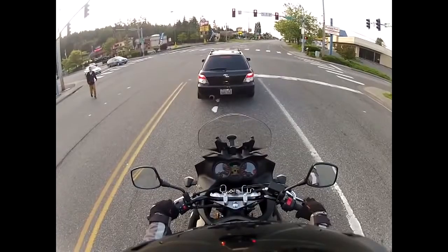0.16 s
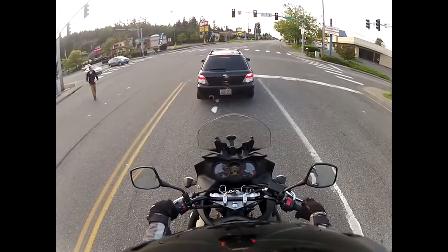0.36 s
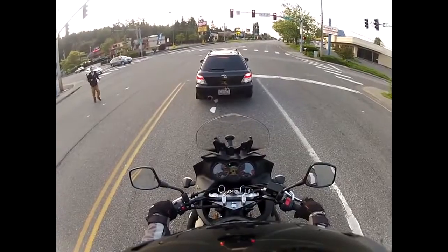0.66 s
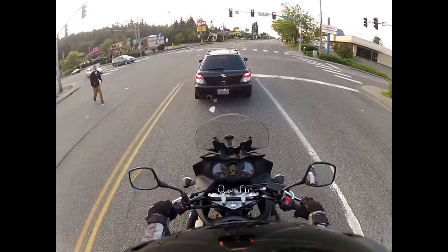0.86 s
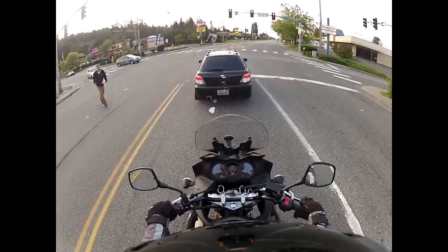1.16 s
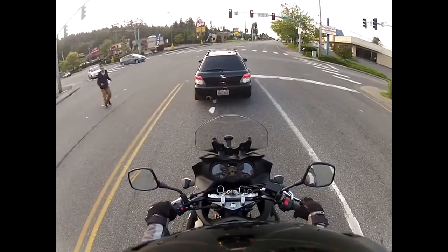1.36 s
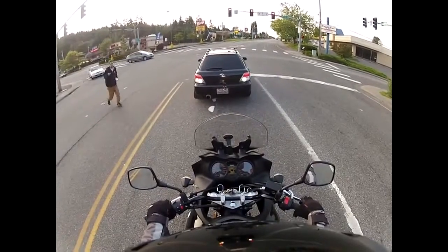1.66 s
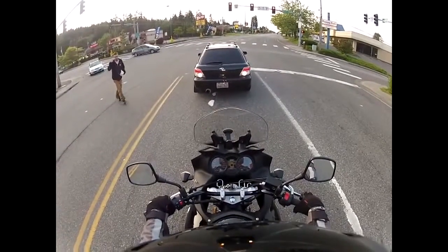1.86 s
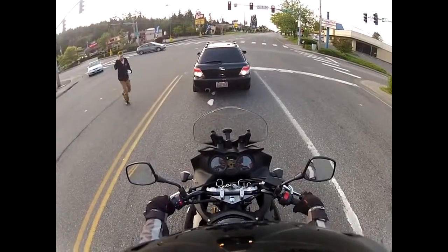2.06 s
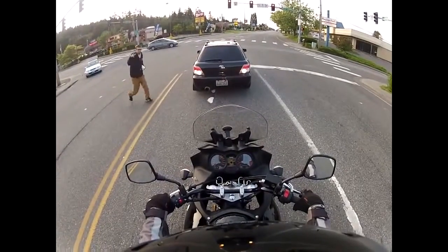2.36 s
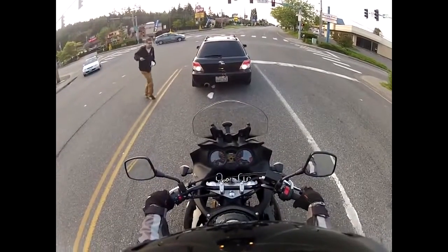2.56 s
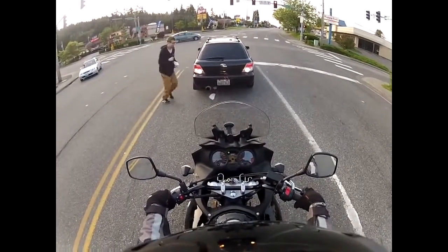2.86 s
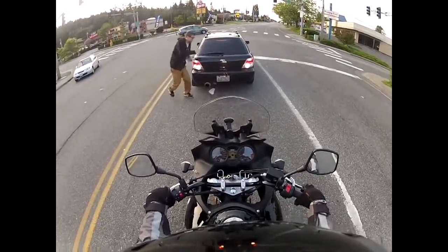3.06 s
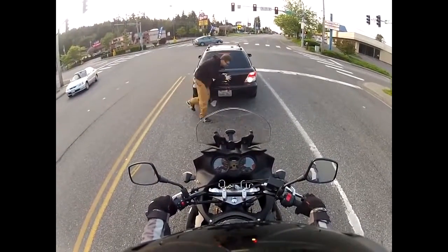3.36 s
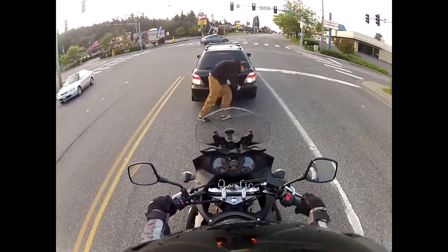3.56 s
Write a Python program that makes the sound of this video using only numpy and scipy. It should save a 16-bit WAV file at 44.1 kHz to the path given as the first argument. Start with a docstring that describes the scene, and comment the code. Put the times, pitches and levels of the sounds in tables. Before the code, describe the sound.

A twin-cylinder motorcycle lopes at idle over muffled traffic rumble, revs once sharply, and drops back.

```python
"""Uneven exhaust beats of an idling twin-cylinder motorcycle at a junction, heard inside a closed case on the
rider, over traffic rumble, road noise ringing in the case and a faint electronic whine. One blip of the
throttle brings an even intake throb, then the engine settles back, with short scuffs against the case.
Beats are clicks through pipe resonances, the throb is summed crank orders, and the road is shaped noise.
The recorder holds each sample at a low rate, which mirrors the sound into the treble."""
import sys
import numpy as np
from scipy import signal
from scipy.fft import rfft, irfft
from scipy.io import wavfile
from scipy.ndimage import uniform_filter1d

SR = 44100
rng = np.random.default_rng(int(sys.argv[2]) if len(sys.argv) > 2 else 0)


def log_audio(samples):
    """Write samples as a 16-bit WAV file to the path given in sys.argv[1]."""
    # one column per channel
    frames = np.atleast_2d(samples).T
    # limit to full scale, then quantise
    limited = np.clip(frames, -1, 1)
    pcm = np.round(limited * 32767).astype(np.int16)
    wavfile.write(sys.argv[1], SR, pcm)


N = 163170
T = np.arange(N) / SR  # seconds


def gain_of(db):
    """Amplitude factor of a level in dB."""
    return 10 ** (np.asarray(db) / 20)


def evened(x):
    """Scales a signal to an overall rms of 1."""
    return x / np.sqrt(np.mean(x ** 2) + 1e-20)


def curve(points, column=1):
    """Draws straight lines over time through one column of a table whose first column is seconds."""
    columns = np.transpose(points)
    return np.interp(T, columns[0], columns[column])


def resonate(x, hz, width):
    """One fixed two-pole resonance with a gain of about 1 at its peak."""
    radius = np.exp(-np.pi * width / SR)
    poles = [1, -2 * radius * np.cos(2 * np.pi * hz / SR), radius * radius]
    return signal.lfilter([1 - radius, 0, radius - 1], poles, x)


def body(x, peaks):
    """Parallel resonances of a hollow body, each at its own level."""
    return sum(gain_of(db) * resonate(x, hz, width) for hz, width, db in peaks)


def noise(spectrum, patchy_db, flicker_db):
    """Noise from random short-time spectra with drifting patches and a flicker shared by all bands; rms 1."""
    frames = N // 128 + 5
    real, imaginary, patches = rng.standard_normal((frames, 257, 3)).T
    patches = uniform_filter1d(patches, size=5, axis=0)  # across bands
    patches = evened(uniform_filter1d(patches, size=16, axis=1))  # across time
    flicker = evened(uniform_filter1d(rng.standard_normal(frames), size=8))
    grains = (real + 1j * imaginary) * gain_of(patchy_db * patches + flicker_db * flicker)
    flat = signal.istft(grains, nperseg=512, noverlap=384)[1][:N]
    corner_hz, db = np.transpose(spectrum)
    hz = np.fft.rfftfreq(N, 1 / SR)
    shape = gain_of(np.interp(np.log(hz + 1), np.log(corner_hz + 1), db))
    return evened(irfft(rfft(flat) * shape, N))


def train(turns, db, spread_db, jitter_s):
    """One uneven click per whole turn, scaled so its mean power does not follow the speed."""
    at = np.flatnonzero(np.diff(np.floor(turns)) > 0)
    chance = rng.standard_normal((200, 2))[:len(at)]
    shift = np.round(jitter_s * SR * chance[:, 0]).astype(int)
    where = np.clip(at + shift, 0, N - 1)
    out = np.zeros(N)
    out[where] = gain_of(db + spread_db * chance[:, 1]) / np.sqrt(np.gradient(turns)[at])
    return out


def crank():
    """Crank speed in turns per second, and its running sum: the angle in turns that times the engine."""
    # The engine revs. Each row: time in seconds, crank speed in turns per second.
    revs = [(0, 22.53), (.5, 22.72), (1, 22.41), (1.3, 23.8), (1.6, 23.01), (1.95, 22.82), (2.03, 23.68),
            (2.1, 31.58), (2.2, 37.67), (2.33, 45.15), (2.42, 52.74), (2.5, 60.79), (2.6, 64.7),
            (2.68, 62.6), (2.8, 54), (2.95, 44.84), (3.1, 38.83), (3.25, 32.52), (3.4, 22.89), (3.7, 21.92)]
    start_turns = .95
    speed = curve(revs)
    return speed, start_turns + np.cumsum(speed) / SR


def exhaust(turns):
    """Beats at uneven places in each two-turn cycle ring the pipes and echo; also returns the bare beats."""
    # Loudness of the exhaust. Each row: time in seconds, level in dB.
    loudness = [(0, -57.5), (.6, -50), (1.3, -53.5), (1.95, -54.5), (2.1, -49), (2.65, -49.5),
                (2.78, -49.5), (2.9, -51), (3.0, -49), (3.3, -53), (3.4, -50), (3.7, -51.5)]
    # Beats of one two-turn cycle. Each row: place in the cycle (0-1), relative level in dB, index of its pipe.
    firing = [(-.03, 1, 0), (0.328, -7.5, 1), (0.579, -4.5, 1)]
    # One list of resonances per pipe. Each row: centre in Hz, width in Hz, relative level in dB.
    pipes = [
        [(64, 25, -7), (108, 35, 0), (150, 60, -3), (280, 50, -10)],
        [(64, 25, -7), (104, 30, -5), (192, 20, 6), (240, 40, -9), (285, 35, -5)],
    ]
    # Echoes off road and cars. Each row: delay in seconds, level in dB against the direct sound.
    echoes = [(.007, -9), (.016, -8), (.027, -10), (.041, -12)]
    beats = [train(turns / 2 - place, db, spread_db=1.8, jitter_s=.0008) for place, db, _ in firing]
    soften = signal.butter(4, 306, fs=SR, output="sos")  # low-pass, Hz
    direct = np.zeros(N)
    for beat, (_, _, pipe) in zip(beats, firing):
        direct += body(signal.sosfilt(soften, beat), pipes[pipe])
    rings = direct.copy()
    for k, (delay, db) in enumerate(echoes, 1):
        delayed = np.pad(direct, (round(delay * SR), 0))[:N]
        rings += (-1) ** k * gain_of(db) * delayed  # alternating polarity
    return evened(rings) * gain_of(curve(loudness)), sum(beats)


def rumble():
    """Low traffic rumble: noise weighted to the bass, with drifting patches and flicker."""
    # Tone of the rumble. Each row: frequency in Hz, relative spectral level in dB.
    tone = [(8, -6), (18, -19), (50, -5), (110, -2), (200, -14), (300, -12), (420, -35.5), (700, -31.5),
            (1100, -28)]
    return gain_of(-55) * noise(tone + [(3000, -76)], patchy_db=-1.0, flicker_db=-2.0)


def road_hiss():
    """Broad road hiss: shaped noise with slight patches and flicker."""
    # Tone of the hiss. Each row: frequency in Hz, relative spectral level in dB.
    tone = [(350, -7), (600, -5), (707, -12), (874, -30), (1160, -3.5), (1670, -5.5), (1910, -1.5),
            (2800, -12.5), (3090, -18), (3400, -21), (3780, -40), (5140, -28.5), (6000, -68), (7800, -76),
            (13200, -120)]
    return gain_of(-56) * noise(tone, patchy_db=.8, flicker_db=.3)


def case_ring(beats):
    """Road noise rings the resonances of the case, lifted a little after each beat that shakes it."""
    # Resonances of the case. Each row: centre in Hz, width in Hz, relative level in dB.
    peaks = [(521.6, 52, -6.5), (795, 16, -15), (1154, 198, 1), (1464, 78, -7.5), (1874, 73, 2),
             (2268, 64, -3), (2992, 64, -6.5), (3617, 154, -12.5)]
    clatter_db, clatter_s = .5, .0069  # lift per mean shake, decay time of a shake
    shake = signal.oaconvolve(beats, np.exp(-T[:4000] / clatter_s))[:N]
    lift = gain_of(clatter_db * np.minimum(shake / shake.mean(), 3))
    road = noise([(300, 6.5), (6000, -12.5)], patchy_db=-0.46, flicker_db=-1.3)  # (Hz, relative dB)
    return gain_of(-53.5) * evened(lift) * evened(body(road, peaks))


def whine():
    """Faint steady tones of the electronics: sines at random phases."""
    # Each row: frequency in Hz, rms level in dB.
    tones = [(5039, -86), (5087, -92.5)]
    out = np.zeros(N)
    for hz, db in tones:
        out += np.sqrt(2) * gain_of(db) * np.sin(2 * np.pi * (hz * T + rng.random()))
    return out


def intake(speed, turns):
    """One smooth throb a turn: crank orders through the airbox, lagging as they cross its ring."""
    # The throttle opening and shutting. Each row: time in seconds, level in dB, tilt in dB per order.
    throttle = [(1.95, -62.5, -0.5), (2.03, -43.5, -1.5), (2.1, -44.5, 0), (2.19, -31, -2), (2.29, -36, -1),
                (2.37, -34, -0.5), (2.49, -36, 1.6), (2.56, -35.5, 0.55), (2.63, -40, -2),
                (2.72, -49.5, -1), (2.8, -33, -20), (2.87, -56, -4), (2.95, -55, 1), (3.12, -53, 0.5),
                (3.27, -45, -2), (3.36, -47, -2.5), (3.45, -75, 2)]
    # Response of the airbox. Each row: frequency in Hz, relative level in dB.
    airbox = [(20, -29), (40, -18), (52, -10), (68, -3), (88, -3.5), (118, 5.5), (135, 3.5), (155, -20),
              (185, -7), (215, -11.5), (255, -9.5), (310, -23.5), (380, -27.5), (520, -31.5), (700, -52)]
    waver_db = .6
    ring_hz, ring_width_hz, ring_lag = 120, 30, .5  # lag in radians per radian of arctangent
    shut_s, shut_fade_s, smear = 2.58, .15, .7  # smear in radians, times order squared
    airbox_hz, airbox_db = np.transpose(airbox)
    tilt = curve(throttle, column=2)
    shut = np.clip((T - shut_s) / shut_fade_s, 0, 1)
    out = np.zeros(N)
    for k in range(1, 15):
        hz = k * speed
        waver = evened(np.interp(T, np.arange(100) / 25, rng.standard_normal(100)))  # 25 points a second
        level = np.interp(np.log(hz), np.log(airbox_hz), airbox_db) + tilt * (k - 1) + waver_db * waver
        lag = ring_lag * np.arctan((hz - ring_hz) / ring_width_hz)
        drift = smear * k * k * shut  # orders drift apart as the throttle shuts
        out += gain_of(level) * np.cos(2 * np.pi * k * turns - drift - lag)
    return gain_of(curve(throttle)) * out


def rattles():
    """Short scuffs against the case: narrow-band noise with a quick rise and a bell-shaped fall."""
    # Each row: start in seconds, level in dB, fall time in seconds, centre in Hz, width in Hz.
    scuffs = [(2.84, -50, .015, 420, 500), (3.164, -41, .004, 2250, 450), (3.166, -50, .022, 900, 700),
              (3.175, -44, .016, 2100, 500), (3.554, -44, .010, 520, 400)]
    out = np.zeros(N)
    for start, db, length, hz, width in scuffs:
        t = np.clip(T - start, 0, None)
        once = resonate(rng.standard_normal(N), hz, width)
        ring = evened(resonate(once, hz, width))
        rise = np.minimum(t / .0015, 1)  # 1.5 ms
        out += gain_of(db) * ring * rise * np.exp(-(t / length) ** 2)
    return out


def scene():
    """Sums engine, street, electronics and scuffs into one channel."""
    speed, turns = crank()
    pipe_sound, beats = exhaust(turns)
    street = rumble() + road_hiss() + case_ring(beats)
    return (pipe_sound + street + whine() + intake(speed, turns) + rattles())[None]


def record(dry):
    """Samples held at a low rate: a mirror image around that rate under a sinc; then the band limit."""
    hold_hz, alias_hz, edge_hz = 12000, 5750, 15300  # hold rate, low-pass before it, final band limit
    hz = np.fft.rfftfreq(N, 1 / SR)
    droop = np.sinc(np.minimum(hz, alias_hz) / hold_hz)  # undone ahead of the hold
    low = irfft(rfft(dry) / droop / np.sqrt(1 + (hz / alias_hz) ** 40), N)
    mirrored = low * (1 + 2 * np.cos(2 * np.pi * hold_hz * T))
    held = irfft(rfft(mirrored) * np.sinc(hz / hold_hz), N)
    limit = signal.firwin(1023, edge_hz, window=("kaiser", 10), fs=SR)
    return signal.oaconvolve(held, limit[None], "same")


dry = scene()
out = record(dry)
log_audio(out)
```